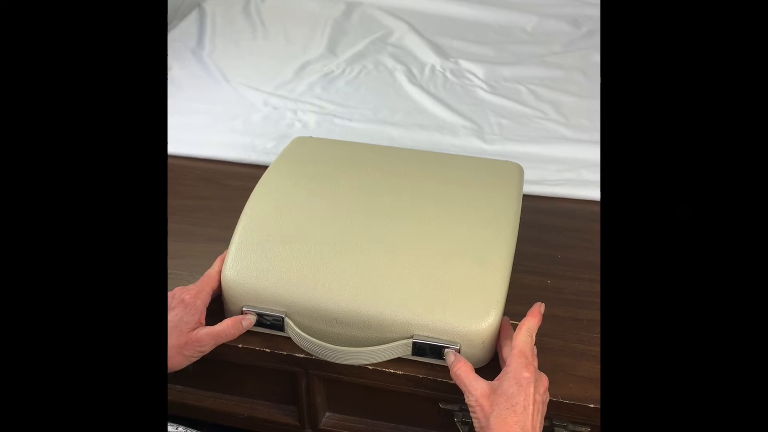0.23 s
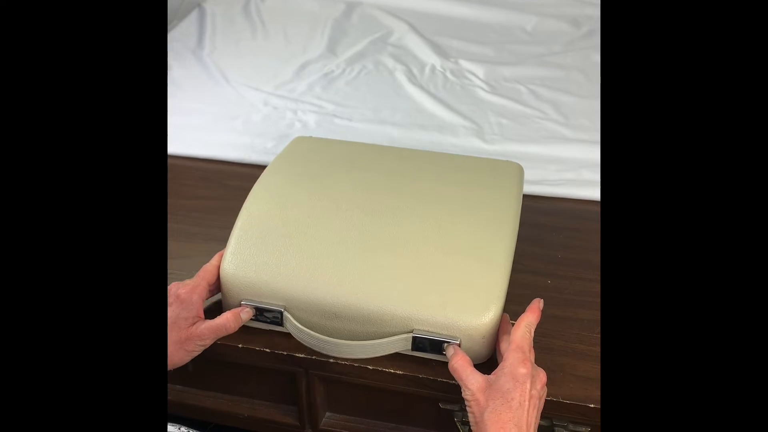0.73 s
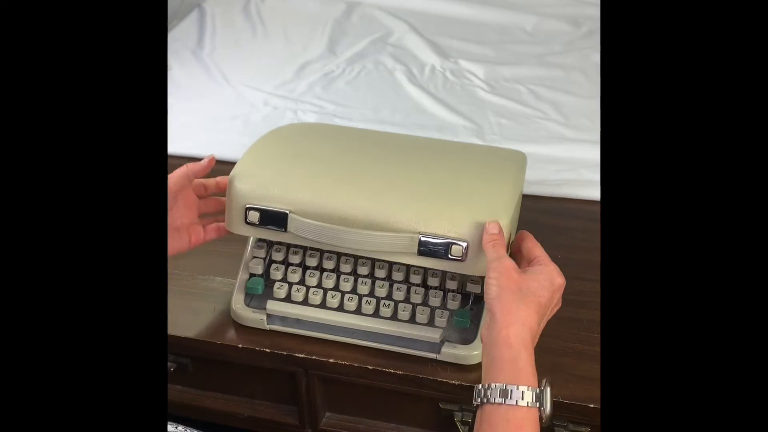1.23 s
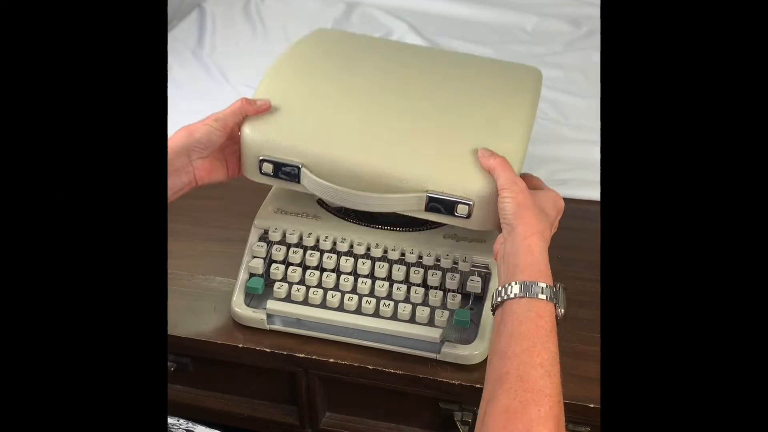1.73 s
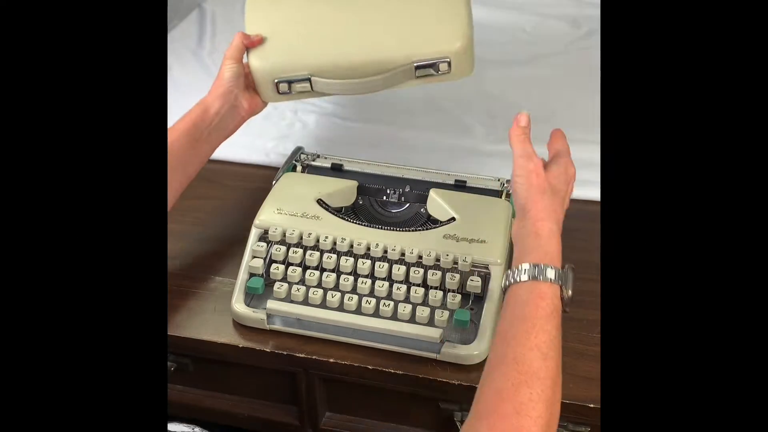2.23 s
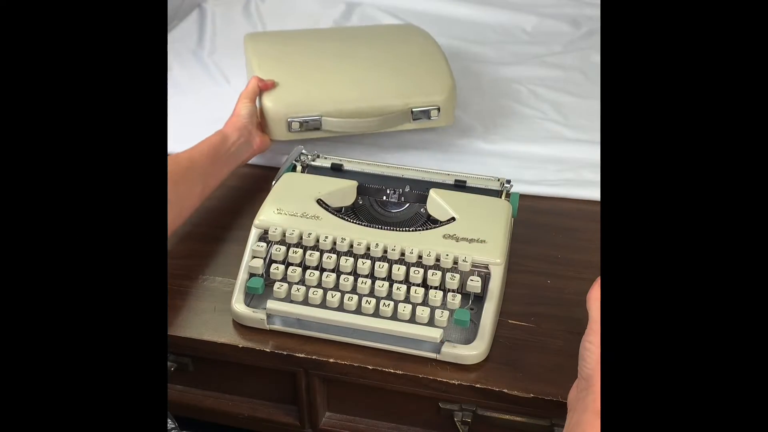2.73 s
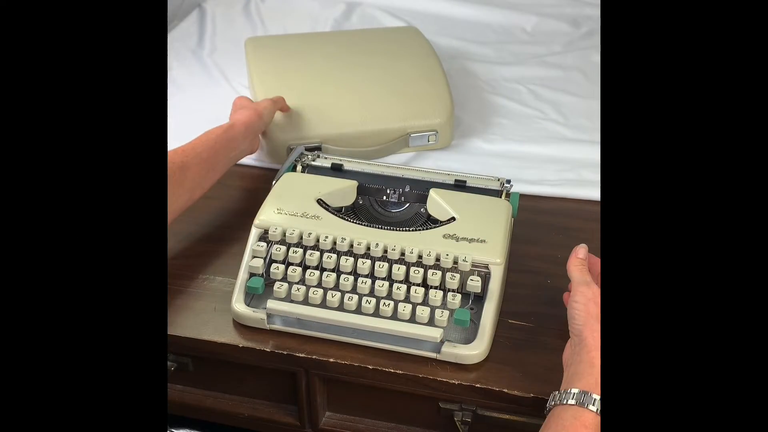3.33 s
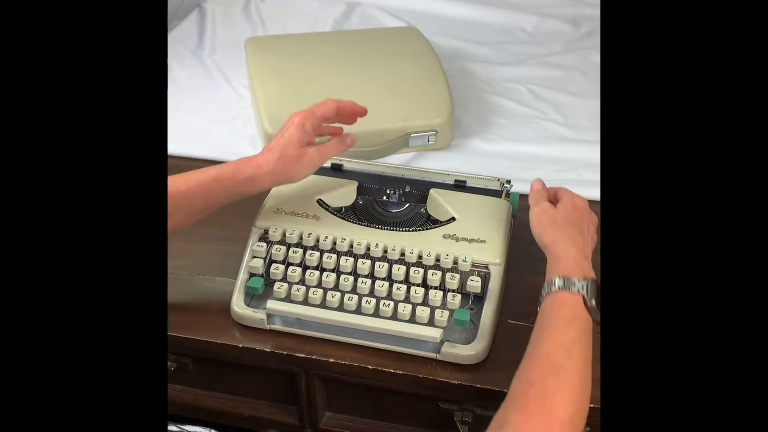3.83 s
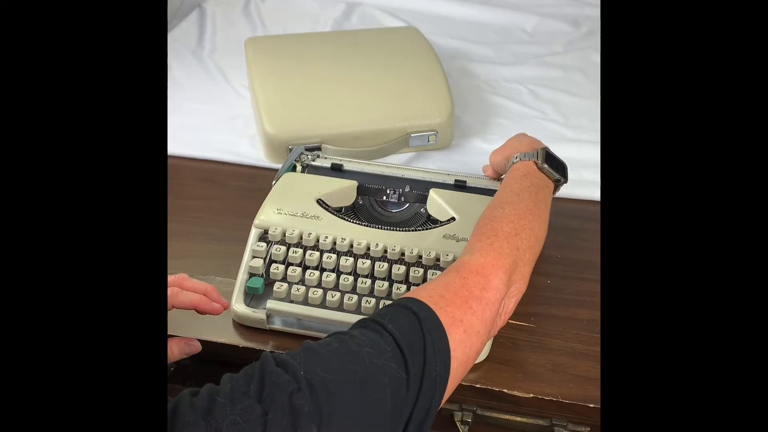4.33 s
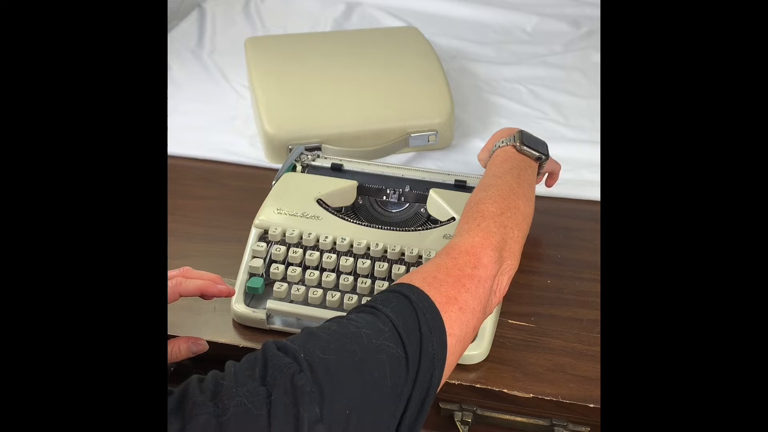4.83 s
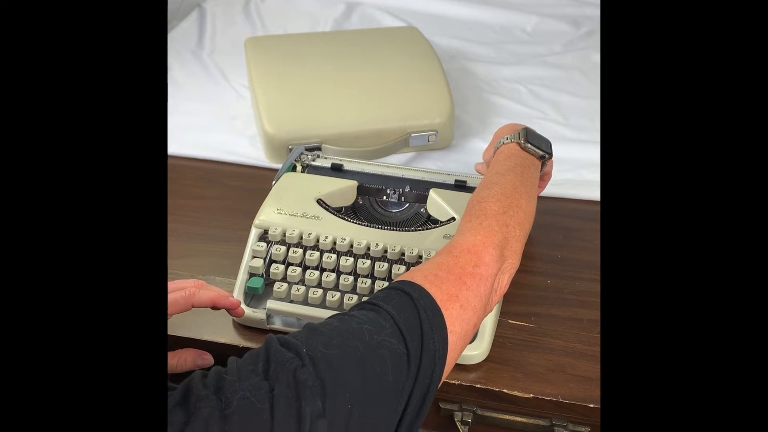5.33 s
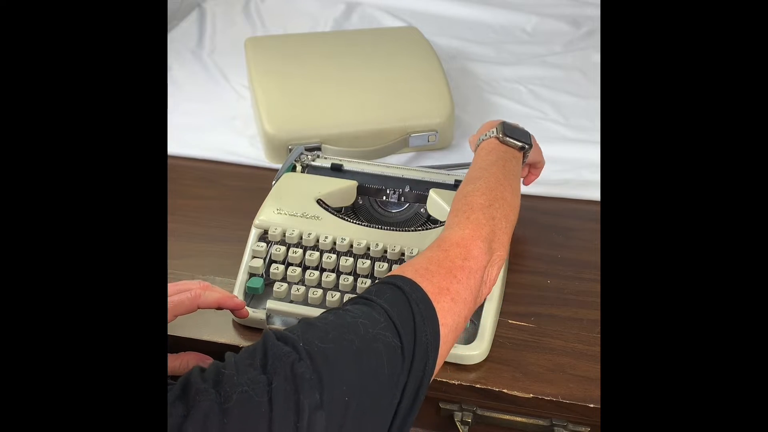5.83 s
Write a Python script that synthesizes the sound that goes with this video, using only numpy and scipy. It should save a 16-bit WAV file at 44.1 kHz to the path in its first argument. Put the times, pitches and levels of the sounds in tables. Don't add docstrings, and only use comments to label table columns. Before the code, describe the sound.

Close up in a small damped room, thumbs spring two steel latches in a quick cluster of bright clicks. A hollow hard lid pops, bumps and scrapes as it is lifted, with a short rattle. After a brief lull it lands in three dull, hollow knocks on the desk, evenly spaced. Then a small steel lever snaps hard with tiny bounces, followed by a couple of faint clicks over low room rumble.

```python
import sys
import numpy as np
from scipy import signal
from scipy.fft import rfft, irfft, next_fast_len
from scipy.io import wavfile
from scipy.ndimage import uniform_filter1d

SR = 44100
rng = np.random.default_rng(int(sys.argv[2]) if len(sys.argv) > 2 else 0)


def volts_from_db(level):
    exponent = np.asarray(level, float) / 20
    return 10 ** exponent


def file_out(sig):
    cols = np.atleast_2d(sig).T
    lim = np.clip(cols, -1, 1)
    pcm = np.round(lim * 32767).astype(np.int16)
    wavfile.write(sys.argv[1], SR, pcm)


N = 268877
T = np.arange(int(.6 * SR)) / SR

# (frequency [Hz], level [dB], t60 [s])
SHELL_MODES = [(170, -6.5, 0.25), (215, -11.5, 0.12), (272, -1.5, 0.41), (358, -1, 0.27),
               (449, -10.5, 0.33), (543.4, -9, 0.27), (647, -6.5, 0.13), (693.4, -1.5, 0.25),
               (796, -13.5, 0.11), (990, -6, 0.077)]
# (centre [Hz], width [Hz], level [dB])
BRIGHT_PEAKS = [(6100, 7500, 5.5), (9170, 5000, -12.5), (13800, 2500, -22)]
# (centre [Hz], width [Hz], level [dB])
STEEL_BODY_PEAKS = [(1060, 140, -2.5), (1920, 190, -5), (2960, 140, 1), (3800, 203, 1.5), (4580, 73, -5.5),
                    (5900, 510, -5.5)]


def band(x, hz, width_hz):
    return signal.lfilter(*signal.iirpeak(min(hz, .45 * SR), hz / width_hz, fs=SR), x)


def unit(x):
    return x / np.sqrt(np.mean(x ** 2))


def shaped(x, table):
    hz, db = np.transpose(table)
    n = next_fast_len(x.shape[-1], real=True)
    f = np.arange(n // 2 + 1) * SR / n + 1
    gain = volts_from_db(np.interp(np.log(f), np.log(hz), db))
    return irfft(rfft(x, n) * gain, n)[..., :x.shape[-1]]


def resonant(noise, peaks):
    return unit(sum(volts_from_db(db) * band(noise, hz, width_hz) for hz, width_hz, db in peaks))


def fade(t60_s):
    return np.exp(-np.log(1000) * T / np.clip(t60_s, .01, .6))


def soft(x, contact_hz):
    return signal.sosfilt(signal.butter(2, min(contact_hz, 15000), fs=SR, output="sos"), x)


def ring(modes, rise_cycles, scatter_db=0, split=0, linger=2, longest_s=0.098):
    y = 0
    for k, (hz, db, t60_s) in enumerate(modes):
        rise = 1 - np.exp(-T * hz / max(rise_cycles, .05))
        chance = rng.standard_normal(2)
        t60_s = min(t60_s, longest_s + 11 / hz)
        twin_hz = hz * (1 + 0.071 * np.tanh(chance[1] * 2))
        twin = split * fade(linger * t60_s) * np.sin(2 * np.pi * twin_hz * T)
        level = (-1) ** k * volts_from_db(db + scatter_db * chance[0])
        y = y + level * rise * fade(t60_s) * (np.sin(2 * np.pi * hz * T) + twin)
    return y / np.abs(y).max()


def burst(peaks, t60_s, rise_s=.0003):
    body = resonant(rng.standard_normal(len(T)), peaks)
    return body * fade(t60_s) * (1 - np.exp(-T / max(rise_s, 1e-4)))


def walk(rate_hz):
    k = int(SR / rate_hz)
    return 1.3 * uniform_filter1d(np.repeat(rng.standard_normal(N // k + 1), k), k)[:N]


def stroke(s, rise_s, fall_s):
    depth_db = 30
    t = np.arange(N) / SR - s
    off_peak = np.maximum(-t / max(rise_s, .003), t / max(fall_s, .003))
    return np.exp(-depth_db * np.log(10) / 20 * off_peak)


def add(out, s, y, pan_db=0):
    i = int(s * SR)
    gains = volts_from_db(np.array([[pan_db], [-pan_db]]) / 2)
    out[:, i:i + len(y)] += (gains * y)[:, :N - i]


def late(x, lead):
    n = next_fast_len(N, real=True)
    turn_rad = np.interp(np.arange(n // 2 + 1) * SR / n, *np.transpose(lead))
    return irfft(rfft(x, n) * np.exp(-1j * turn_rad), n)[:N]


def air():
    # (frequency [Hz], level [dB per Hz])
    spectrum = [(15, -48), (25, -28.5), (59, -2.5), (92, -9.5), (170, -12), (270, -12), (427, -13.5),
                (840, -25), (1160, -36.5), (1330, -28.5), (3250, -45.5), (9570, -49.5), (16000, -47.5)]
    # (frequency [Hz], left-right likeness [0-1])
    likeness = [(30, 0.99), (200, 0.75), (500, 0.3), (1500, 0.59), (5000, 0.27), (9000, 0.64),
                (14000, 0.67)]
    hz, alike = np.transpose(likeness)
    alike = np.clip(alike, 0, .999)

    def weigh(x, power):
        return shaped(x, np.transpose([hz, 10 * np.log10(power)]))

    mid, side = shaped(rng.standard_normal((2, N)), spectrum)
    mid, side = weigh(mid, (1 + alike) / 2), weigh(side, (1 - alike) / 2)
    both = np.array([mid + side, mid - side])
    bass = band(both, 100, 66) * (volts_from_db(2 * walk(7)) - 1)
    bass = bass + band(both, 210, 400) * (volts_from_db(0.81 * walk(23)) - 1)
    rustle = band(both, 2200, 2200) * (volts_from_db(0.94 * walk(4.4) - 2.5) - 1)
    return volts_from_db(-54.5) * unit(both + bass + rustle)


def room(dry):
    # (centre [Hz], t60 [s], level [dB], side level [dB])
    decay_bands = [(86.9, 0.31, -23.5, -18.5), (274.4, 0.16, -23, -4), (744, 0.13, -20.5, 4),
                   (1960, 0.22, -19, -19.5), (4990, 0.14, -11.5, 2), (11090, 0.044, -23, 5)]
    tail = 0
    for hz, t60_s, db, side_db in decay_bands:
        noise = band(rng.standard_normal((2, len(T))), hz, 0.7 * hz)
        mid, side = noise * fade(t60_s) / np.sqrt(t60_s * hz / 10)
        tail = tail + volts_from_db(db) * np.array([mid + volts_from_db(side_db) * side, mid - volts_from_db(side_db) * side])
    tail *= 1 - np.exp(-T / 0.0017)
    return signal.fftconvolve(dry, tail, axes=1)[:, :N]


def slides():
    # (centre [Hz], width [Hz], level [dB])
    dull_peaks = [(630, 390, 1.5), (1690, 490, -4), (2300, 250, -3.5)]
    # (peak time [s], rise [s], fall [s], level [dB], brightness [dB])
    rubs = [(.03, 0.061, 0.53, -63.5, -25), (0.356, 0.037, 0.1, -40, -3), (.446, 0.0092, 0.071, -60, -20),
            (0.735, 0.05, 0.25, -64, -22), (1.13, 0.43, 0.97, -46.5, -8), (1.31, 0.047, 0.057, -59, 3),
            (1.63, 0.2, 0.12, -42.5, -1), (1.672, 0.028, 0.055, -31, -30), (1.93, 0.043, 0.077, -49.5, 1),
            (2.063, 0.018, 0.046, -41.5, -34), (2.225, 0.081, 0.076, -55.5, -14),
            (3.25, 0.46, 0.57, -56, -3), (5.617, 0.014, 0.37, -60.5, -30)]
    # (peak time [s], rise [s], fall [s], level [dB])
    scrapes = [(.362, 0.12, 0.073, -54), (0.499, 0.16, 0.086, -47.5), (.8, 0.3, 0.5, -44),
               (1.062, 0.18, 0.91, -39.5), (1.196, 0.3, 0.073, -51), (1.315, 0.04, 0.054, -53),
               (1.671, 0.033, 0.042, -25.5), (1.93, 0.069, 0.27, -38), (2.064, 0.11, 0.1, -61),
               (2.228, 0.39, 0.15, -60.5), (3.24, 0.5, 0.48, -44), (3.35, 0.02, 0.0081, -36.5)]
    grains = rng.standard_normal(N) * volts_from_db(1.7 * walk(45) + 3.5 * walk(400))
    shell_peaks = [(hz, 5.0 / t60_s, db - 6 * np.log2(hz / 300)) for hz, db, t60_s in SHELL_MODES]
    dull = soft(resonant(grains, dull_peaks), contact_hz=3750)
    bright = resonant(grains, BRIGHT_PEAKS)
    hollow = soft(resonant(grains, shell_peaks), contact_hz=2000)
    skin = sum(stroke(s, rise_s, fall_s) * volts_from_db(db - 7.5) * (dull + volts_from_db(bright_db) * bright)
               for s, rise_s, fall_s, db, bright_db in rubs)
    rim = sum(stroke(s, rise_s, fall_s) * volts_from_db(db - 7) for s, rise_s, fall_s, db in scrapes)
    return skin + hollow * rim


def bumps():
    # (time [s], level [dB], strongest ring [Hz], rap over ring [dB], t60 [s])
    prying = [
        (0.349, -43, 275, -15, 0.19),
        (0.363, -30, 223.6, -15, 0.065),
        (0.722, -42.5, 275, -12, 0.21),
        (0.733, -35, 222, -51, 0.057),
        (0.788, -50, 850, -14, 0.04),
        (0.84, -53, 774, -49, 0.14),
    ]
    # (time [s], level [dB], strongest ring [Hz], rap over ring [dB], t60 [s])
    lifting = [
        (0.988, -45, 289, -24, 0.44),
        (1.046, -49, 676, 2, 0.074),
        (1.059, -38.5, 167, -34, 0.071),
        (1.098, -29.5, 309, -12, 0.054),
        (1.182, -38.5, 355, -4.5, 0.12),
        (1.286, -51.5, 854, 1, 0.33),
        (1.434, -57.5, 272, -7.5, 0.7),
        (1.498, -48, 167, -8, 0.09),
        (1.566, -47, 674, -20, 0.12),
        (1.575, -42.5, 269, -16.5, 0.3),
    ]
    # (time [s], level [dB], strongest ring [Hz], rap over ring [dB], t60 [s])
    rattling = [
        (1.665, -32, 1040, -1, 0.08),
        (1.681, -38.5, 240, 7, 0.039),
        (1.842, -42.5, 358, -24.5, 0.36),
        (1.909, -69.5, 467, 10, 0.23),
        (1.926, -47, 651, -5.5, 0.2),
        (1.963, -49.5, 369, -6, 0.16),
        (2.001, -46, 520, 1.5, 0.1),
        (2.027, -50.5, 377, 8, 0.043),
        (2.062, -45, 377, 1, 0.12),
    ]
    # (time [s], level [dB], strongest ring [Hz], rap over ring [dB], t60 [s])
    touches = [(2.189, -63, 180, 14, 0.034), (2.208, -57, 299, 17, .027), (2.224, -56, 358, 1, 0.09),
               (2.79, -60, 373, -4.5, 0.15), (3.131, -54.5, 170, -6.5, 0.071), (3.198, -59, 215, -7, 0.27),
               (3.234, -47.5, 750, -12, 0.11), (0.371, -46.5, 92, -40, 0.15), (2.241, -62, 1023, 2, 0.1),
               (2.95, -36.5, 271, -17, 0.16), (4.36, -74, 300, -6, 0.39), (4.529, -50, 82.7, -28, 0.086),
               (4.603, -55, 82.5, -38.5, .091), (5.07, -60.5, 306, 0, 0.075), (5.62, -70, 297, 14, 0.039),
               (5.719, -78, 303, 13, 0.089)]
    ticks_db = (-39, -12.5, -5, -25.5)
    # (centre [Hz], width [Hz], level [dB])
    rap_peaks = [(1480, 330, 4.5), (1875, 190, 10.5), (2897, 900, -26)]
    out = np.zeros((2, N))
    for rows, tick_db in zip((prying, lifting, rattling, touches), ticks_db):
        for s, db, hz, hard_db, t60_s in rows:
            modes = [(hz, 7, t60_s)]
            modes += [(f, g - 7 * abs(np.log2(f / hz)), d * t60_s * 10) for f, g, d in SHELL_MODES]
            rap = volts_from_db(8.5) * soft(burst(rap_peaks, 0.38 * t60_s, rise_s=0.0041), contact_hz=4000)
            tick = volts_from_db(tick_db) * burst(BRIGHT_PEAKS, 0.36 * t60_s, rise_s=0.00055)
            shell = volts_from_db(9.5) * ring(modes, rise_cycles=0.79, scatter_db=10, split=0.19)
            add(out, s, volts_from_db(db) * (shell + volts_from_db(hard_db) * (rap + tick)))
    return out


def plates():
    # (frequency [Hz], level [dB], t60 [s])
    shut_modes = [(1277, 1.5, 0.16), (1340, -6, 0.36), (1744, -3, 0.11), (2210, -17, 0.17),
                  (3000, -1, 0.14), (4032, -30, 2.6), (4199, -20, 0.19), (5211, -21, 0.22),
                  (5500, -19, 0.17)]
    # (frequency [Hz], level [dB], t60 [s])
    free_modes = [(2760, 3, 0.12), (3450, 6, 0.12), (4043, -20, 0.4), (6150, 2, 0.13), (7106, -8, 0.12),
                  (7730, -25, 0.05), (8672, -9, 0.066)]
    # (frequency [Hz], level [dB], t60 [s])
    frame_modes = [(1042, 1, 0.19), (1876, -2.5, 0.13), (2093, -1, 0.22), (3210, 3, 0.11), (3160, -3, 0.17),
                   (3660, -4.5, 0.21), (3962, -18, 1.9), (4160, -8, 0.37), (4456, -9.5, 0.17),
                   (5445, 0.5, 0.13), (5846, -10.5, 0.26), (6266, -10, 0.23), (6368, -3.5, 0.13)]
    # (frequency [Hz], level [dB], t60 [s])
    pawl_modes = [(1820, -3, 0.11), (2410, -10.5, .08), (3680, -6.5, .14), (4400, 0.5, .14),
                  (5490, -6.5, .1), (6170, 3.5, 0.11), (8200, -1.5, 0.0798)]
    # (frequency [Hz], level [dB], t60 [s])
    desk_modes = [(41.8, 0, .3), (58, -1.5, 0.27)]
    # (time [s], level [dB], share of ring time)
    shut_at = [
        (0.304, -62, .8),
        (0.322, -64, 0.64),
        (0.365, -39.5, .8),
        (0.39, -56, .9),
    ]
    # (time [s], level [dB], share of ring time)
    free_at = [
        (0.2955, -62, .5),
        (0.444, -46, 1.2),
    ]
    # (time [s], level [dB], share of ring time)
    frame_at = [
        (4.4985, -39, 1.087),
        (4.504, -36, .8),
    ]
    # (time [s], level [dB], share of ring time)
    pawl_at = [
        (4.461, -54, .6),
        (5.067, -55, .7),
        (5.425, -43, 1),
        (5.705, -74, 0.77),
    ]
    # (time [s], level [dB], share of ring time)
    desk_at = [
        (2.556, -45, .9),
        (2.961, -46, 0.97),
        (3.362, -46.5, .9),
        (4.53, -53, 0.91),
    ]
    out = np.zeros((2, N))
    for modes, rows in ((shut_modes, shut_at), (free_modes, free_at), (frame_modes, frame_at),
                        (pawl_modes, pawl_at), (desk_modes, desk_at)):
        for s, db, share in rows:
            struck = [(f, g, min(d, .3) * share) for f, g, d in modes]
            y = ring(struck, rise_cycles=1.5, scatter_db=1.0, split=.15, linger=.7, longest_s=.25)
            add(out, s, volts_from_db(db) * y)
    return out


def edge_ticks():
    # (time [s], level [dB], centre [Hz], width [Hz], t60 [s])
    noises = [(0.268, -72, 3200, 500, 0.026), (0.358, -47, 2530, 2200, 0.075), (0.375, -60, 3040, 300, 0.11),
              (0.7, -72, 1700, 1800, 0.11), (0.719, -69, 2300, 1790, 0.086), (0.74, -66.5, 2000, 1500, 0.13),
              (0.789, -57.5, 1450, 880, 0.13), (0.788, -73, 3900, 1500, 0.074),
              (0.83, -53.5, 366, 148, 0.28), (0.85, -64, 770, 198, 0.21), (0.45, -64.5, 720, 250, 0.18),
              (1.5, -63.5, 2130, 600, 0.33), (1.6, -59.5, 2500, 900, .2), (1.668, -55.5, 4400, 1500, 0.054),
              (1.682, -58, 4400, 1500, 0.074), (1.845, -56, 670, 197, 0.17), (1.965, -58, 1700, 800, .06),
              (1.07, -52, 120, 60, 0.22), (0.47, -49, 155, 59.7, 0.28), (0.931, -72, 2170, 300, 0.047),
              (0.975, -73, 3200, 400, 0.21), (1.027, -54.5, 1790, 604, 0.051),
              (1.045, -58, 4400, 4000, 0.066), (1.093, -51.5, 5000, 5000, 0.015),
              (1.156, -57, 2000, 500, 0.065), (1.182, -52.5, 5000, 3000, .03),
              (1.287, -47.5, 2080, 780, .05), (1.289, -52.5, 870, 150, 0.19), (1.44, -68, 4820, 1500, 0.064),
              (2.546, -53.5, 700, 900, .08), (2.79, -65, 735, 402, 0.046), (3.197, -67.5, 1480, 198, .12),
              (3.21, -68, 1940, 201.8, 0.19), (5.615, -64, 3500, 4460, 0.035), (4.46, -57.5, 4510, 700, .06),
              (4.499, -54, 607, 500, 0.15), (5.71, -75, 2080, 907, .08), (5.426, -58.5, 7500, 4000, 0.07),
              (5.427, -61.5, 4500, 2500, .16),
        (0.722, -62, 2700, 1200, 0.094),
        (0.76, -62, 1700, 500, .12),
        (1.436, -55, 900, 900, .05),
        (2.79, -58, 2000, 1500, 0.039),
        (0.362, -45, 1110, 400, 0.065),
        (2.565, -54, 1700, 1800, .3),
        (2.968, -57, 1700, 1800, .28),
        (3.366, -54, 2200, 3000, .3),
    ]
    out = np.zeros((2, N))
    for s, db, hz, width_hz, t60_s in noises:
        add(out, s, 3.48 * volts_from_db(db) * band(burst([(hz, width_hz, 0)], t60_s), hz, width_hz))
    return out


def latch_clicks():
    # (frequency [Hz], level [dB], t60 [s])
    body_modes = [(1417, 1.5, 0.21), (2120, -20, 0.074), (2780, 0, 0.2), (3160, -3, 0.067), (3476, 0, 0.13),
                  (4200, -9, 0.067), (4600, -9, 0.039), (5030, 9, 0.029)]
    # (frequency [Hz], level [dB], t60 [s])
    spring_modes = [(6200, -1.5, 0.035), (6640, -11, 0.1), (7500, 11, 0.039), (7500, -10, 0.023),
                    (8750, -7, 0.04), (8510, 3, 0.048), (8900, -17, 0.049), (9500, -17, 0.037),
                    (10700, -13, 0.058), (12500, -21, .05), (14800, -25, 0.04)]
    # (time [s], level [dB], body level [dB], strongest partial [Hz], left minus right [dB])
    events = [
        (0.266, -61, -80, 7700, 9),
        (0.2957, -53, -55.5, 8000, -16),
        (0.304, -42, -64, 8000, -.6),
        (0.3222, -41, -75, 8750, 4),
        (0.335, -34.5, -65, 8300, 2),
        (0.3465, -36, -50, 8620, -13),
        (0.3733, -39, -41.5, 9900, 2),
        (0.3718, -39, -70, 10040, 1),
        (0.4426, -42, -47.5, 8650, -4),
    ]
    t60_s = 0.046
    out = np.zeros((2, N))

    def stretch(modes):
        return [(f, g, d * t60_s * 10) for f, g, d in modes]

    for s, db, low_db, hz, pan_db in events:
        wash = 0.25 * burst(BRIGHT_PEAKS, t60_s)
        steel = ring(stretch(spring_modes) + [(hz, 4, t60_s)], rise_cycles=5, scatter_db=4)
        low = ring(stretch(body_modes), rise_cycles=2.5, scatter_db=4)
        low = 0.96 * low + 0.53 * burst(STEEL_BODY_PEAKS, t60_s)
        add(out, s, volts_from_db(db) * (steel + wash) + volts_from_db(low_db) * low, 0.41 * pan_db)
    return out


def lever_clicks():
    # (frequency [Hz], level [dB], t60 [s])
    lever_modes = [(2117, -23, 0.2), (7100, -22, 0.212), (7800, 1.5, 0.06), (8900, -16, 0.1183),
                   (9670, -28.5, 0.2), (10100, -3, 0.19), (9641, -5.5, 0.27), (10200, 6, 0.03),
                   (12300, -24.5, 5.0), (12200, -9, 0.12), (12800, 3, 0.025), (12520, -3.5, 0.061),
                   (13190, -14.5, 0.092), (13900, -16.5, 0.12), (14900, -9.5, 0.087), (15200, -23, 0.15)]
    # (frequency [Hz], level [dB per Hz])
    wash_spectrum = [(410, -41.5), (700, -3.5), (898, -25), (1020, -16), (1140, -19.5), (2050, -3),
                     (2460, -23.5), (3030, -19.5), (6830, -11.5), (9860, -1.5), (11500, -5), (13700, 1),
                     (16000, -17)]
    # (time [s], level [dB], body level [dB], t60 [s])
    events = [
        (4.0184, -67, -72, .1),
        (4.461, -35, -60, 0.12),
        (4.4988, -10.5, -54, 0.039),
        (4.5092, -23, -35.5, 0.079),
        (4.52, -27.5, -43.5, 0.14),
        (5.0636, -59, -59, 0.033),
        (5.426, -48, -55, 0.13),
        (5.616, -89, -67.5, 0.11),
        (5.6986, -82, -68, 0.073),
    ]
    pan_db = -0.5
    out = np.zeros((2, N))
    for s, db, low_db, t60_s in events:
        wash = .5 * unit(shaped(rng.standard_normal(len(T)), wash_spectrum)) * fade(t60_s)
        stretched = [(f, g, d * t60_s * 6) for f, g, d in lever_modes]
        steel = ring(stretched, rise_cycles=2.5, scatter_db=4)
        low = volts_from_db(low_db) * burst(STEEL_BODY_PEAKS, t60_s)
        add(out, s, volts_from_db(db) * (steel + wash) + low, 0.35 * pan_db)
    return out


def hollows():
    # (time [s], level [dB], frequency [Hz], rise [s], fall [s])
    swells = [(2.56, -11, 204, .018, .028), (2.615, -28, 208, .025, .045), (2.592, -29, 335, .012, .025),
              (2.57, -23, 620, .01, .02), (2.975, -31, 92, .02, .035), (2.985, -30, 510, .012, .02),
              (2.978, -24, 225, .012, .025), (3.005, -30, 280, .012, .025), (3.04, -42, 80, .025, .08),
              (3.368, -23, 375.3, .02, .03), (3.378, -23, 190, .016, .025), (3.41, -30, 290, .015, .04),
              (0.352, -35, 375, .014, .02), (0.485, -50, 390, .03, .05), (0.748, -36, 205, .012, .05),
              (1.294, -48, 860, .01, .04)]
    sag = .06
    out = np.zeros((2, N))
    for s, db, hz, rise_s, fall_s in swells:
        length_s = rise_s + fall_s
        shape = np.sin(np.pi / 2 * np.interp(T, [0, rise_s, length_s], [0, 1, 0])) ** 2
        add(out, s, volts_from_db(db) * shape * np.sin(2 * np.pi * hz * T * (1 - sag * T / length_s)))
    return out


def knocks():
    # (time [s], level [dB], crack level [dB], far rim delay [s], far rim share, < 0 rocks back)
    landings = [
        (2.5546, -5, -52, .013, -0.13),
        (2.959, -9, -56, .013, 0.014),
        (3.3578, -7, -39.5, .013, 0.47),
    ]
    # (build-up [cycles], thud level [dB], thud t60 [s])
    contacts = [
        (.5, -10.5, 0.1),
        (.5, -12, 0.11),
        (.7, -10, .1),
    ]
    # (frequency [Hz], level [dB], t60 [s])
    first_modes = [(69.2, -20.5, .4), (192.3, -12, 0.07), (262, 0, 0.06), (345.3, 5.5, 0.07),
                   (382, -1.5, 0.068), (445, -13.5, 0.11), (517, -10.5, 0.18), (613, -7, 0.092),
                   (651, -11, 0.12), (721, 3.5, 0.04), (792, -13.5, 0.06), (920, -13, 0.074),
                   (1033, -15, 0.15), (1158, -18, 0.079), (1260, -24.5, 0.11), (1420, -26, 0.22),
                   (1940, -30.5, .1), (2260, -31, .1)]
    # (frequency [Hz], level [dB], t60 [s])
    second_modes = [(77, -5.5, 0.037), (110.2, -10, 0.034), (167, -12, 0.17), (250, 1, 0.07),
                    (275, -5.5, 0.16), (341.5, 4, 0.07), (386, 3, 0.05), (408, -12, 0.21),
                    (510, -6.5, 0.087), (586, -17, 0.056), (730, -3.5, 0.047), (882, -9.5, 0.049),
                    (1027, -15, 0.1), (1340, -34.5, 0.21), (1418, -22, 0.0553), (1894, -25, 0.18),
                    (2344, -33, .1)]
    # (frequency [Hz], level [dB], t60 [s])
    flat_modes = [(87, -25, 0.39), (184, -2, 0.11), (214.2, 5, 0.1), (250, 0, 0.11), (323.4, -12.5, 0.15),
                  (377, -0.5, 0.087), (425, -26, .09), (500, -7.5, 0.12), (581.2, -9.5, 0.15),
                  (607, -5, 0.071), (705, -1.5, 0.15), (758, -8, 0.11), (886, -5.5, 0.035),
                  (1040, -15.5, .11), (1252, -21, 0.25), (1426, -44, .1), (1750, -55.5, .1),
                  (2500, -55.5, .1)]
    # (centre [Hz], width [Hz], level [dB])
    thud_peaks = [(201.3, 240, 0.5), (357, 100, 13), (715, 350, -4.5), (1059, 160, -16), (2000, 830, -39)]
    out = np.zeros((2, N))
    for landing, modes, contact in zip(landings, (first_modes, second_modes, flat_modes), contacts):
        s, db, crack_db, rock_s, share = landing
        rise_cycles, thud_db, thud_t60_s = contact
        body = volts_from_db(3.5) * ring(modes, rise_cycles, split=0.38, linger=0.59, longest_s=0.096)
        body = body + volts_from_db(thud_db) * burst(thud_peaks, thud_t60_s, rise_s=0.0066)
        crack = volts_from_db(crack_db + 7.0) * burst(BRIGHT_PEAKS, 0.037)
        add(out, s + 0.00057, volts_from_db(db) * soft(body, contact_hz=2240) + crack)
        add(out, s + 0.00072 + rock_s, share * volts_from_db(db) * soft(body, contact_hz=1200))
    return out


def scene():
    # (frequency [Hz], left minus right [dB])
    ports = [(250, -0.5), (600, 2.5), (1100, 1.5), (4400, -4.5), (8000, -0.5)]
    # (frequency [Hz], left lead [rad])
    desk_lead = [(0, 0), (1200, .6), (4000, 2.4), (7000, 2.9), (9100, 0), (11600, -3.1), (16400, -9.6)]
    # (frequency [Hz], left lead [rad])
    air_lead = [(0, 0), (1120, 2.5), (5170, 13.5), (7410, 8.9), (16400, -3.8)]
    hum = air()
    desk = slides() + bumps() + latch_clicks() + lever_clicks()
    lid = hollows() + knocks()
    walls = room(desk + volts_from_db(-4.5) * lid)
    desk = desk + lid + walls + plates() + edge_ticks()
    left = shaped(desk[0], np.array(ports) * [1, .5])
    right = shaped(desk[1], np.array(ports) * [1, -.5])
    return np.array([left + hum[0], late(right, desk_lead) + late(hum[1], air_lead)])


def top_cut(x):
    return signal.sosfilt(signal.butter(12, 16830, fs=SR, output="sos"), x)


def record(dry):
    # (frequency [Hz], level [dB])
    mic = [(20, -6.5), (45, 1.5), (10300, -4.5), (11600, -6), (13500, -9), (15500, -3), (16300, -18),
           (17000, -37.5)]
    return top_cut(shaped(dry, mic))


dry = scene()
out = record(dry)
file_out(out)
```